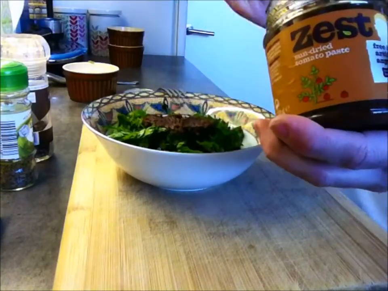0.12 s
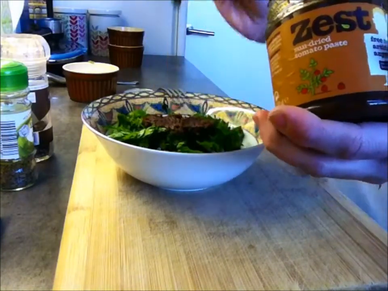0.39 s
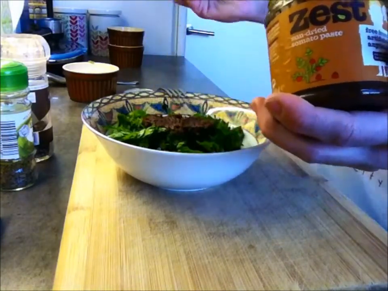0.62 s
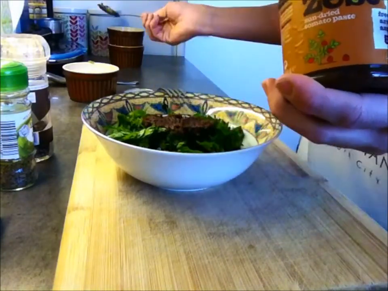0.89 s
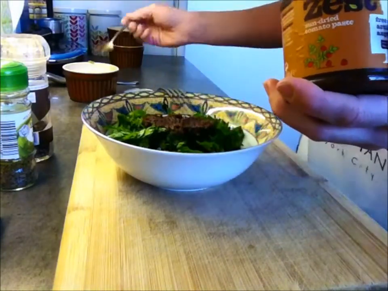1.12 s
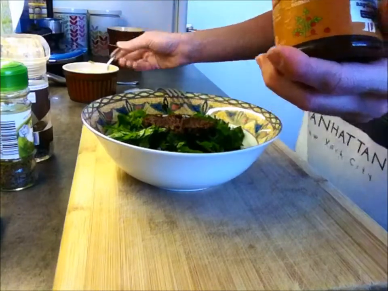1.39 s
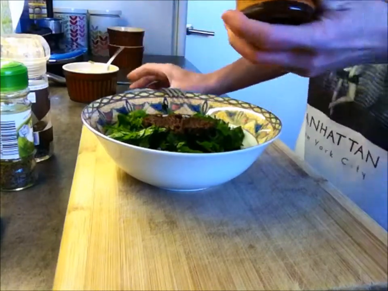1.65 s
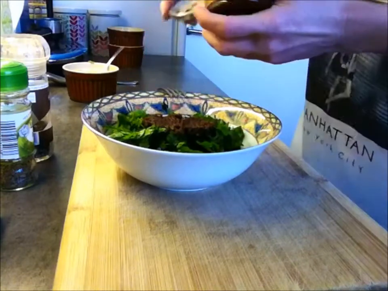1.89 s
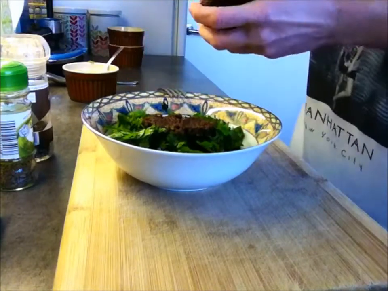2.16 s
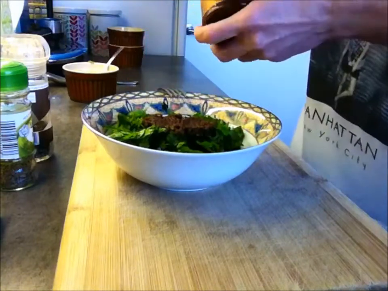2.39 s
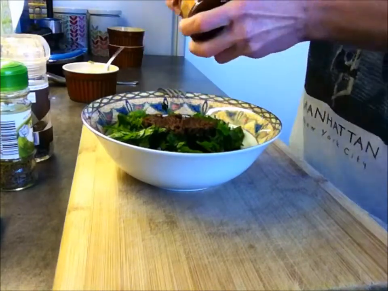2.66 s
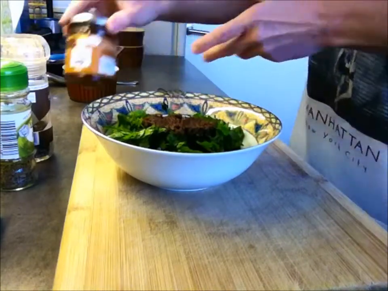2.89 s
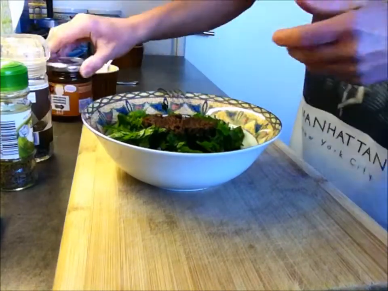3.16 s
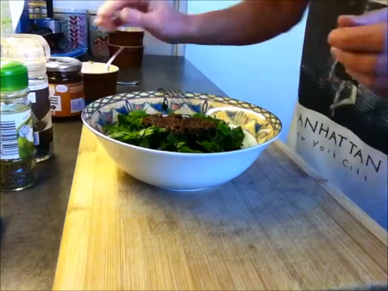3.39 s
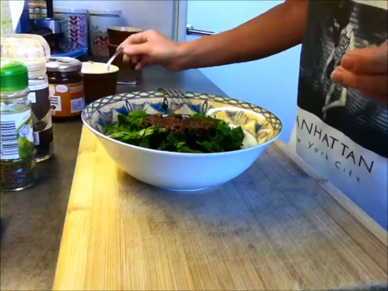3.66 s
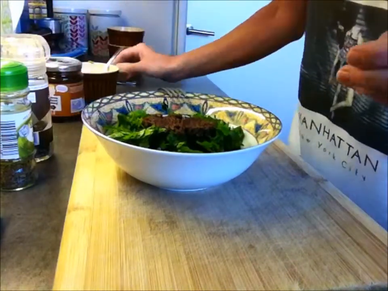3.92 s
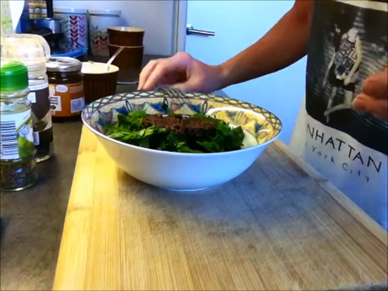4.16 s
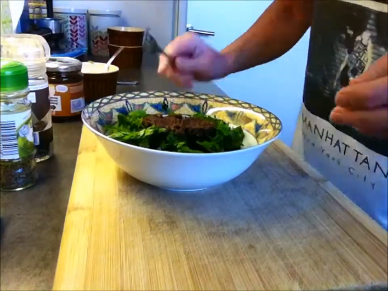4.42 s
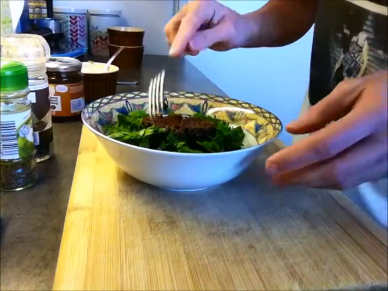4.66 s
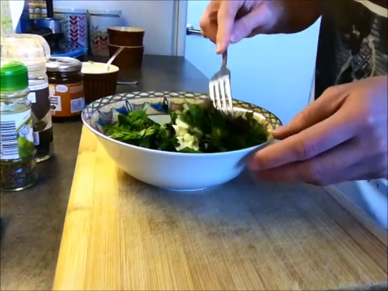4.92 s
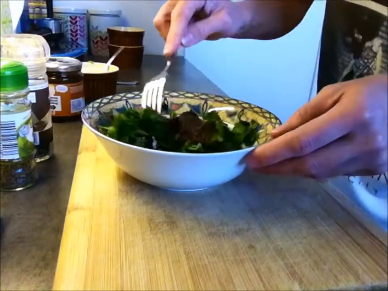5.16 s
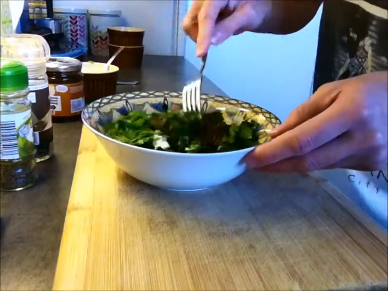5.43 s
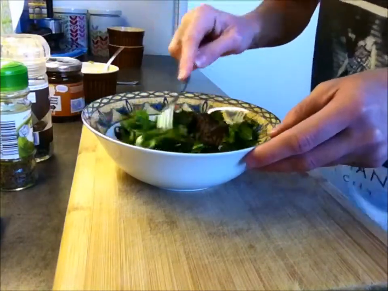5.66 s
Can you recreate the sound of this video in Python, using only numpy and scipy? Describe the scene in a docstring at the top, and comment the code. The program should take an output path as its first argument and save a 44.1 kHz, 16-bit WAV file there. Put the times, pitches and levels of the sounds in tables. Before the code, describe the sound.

Close microphone in a quiet, hard-walled kitchen with faint fridge hum. A teaspoon drops into a small ceramic dish with a bright clink and settles. A metal lid claps onto a glass jar, rattles and catches as it is tightened. The jar lands hard on the counter, by far the loudest sound, and slides briefly. After a pause a fork is picked up with a light ring, then leaves rustle very softly.

```python
"""A quiet kitchen, close microphone. A teaspoon drops into a ceramic dish, a tin lid is clapped on a glass jar
and screwed shut, the jar is set hard on the counter and slid, a fork is dragged up, then tosses leaves.
Blows are decaying modes, noise cracks and low thumps; rubs are uneven click noise through damped modes plus hiss;
leaves are shaped click noise. A fridge hums under room noise throughout; hard walls give a short bright tail."""
import sys
import numpy as np
from scipy import signal
from scipy.fft import rfft, irfft, next_fast_len
from scipy.io import wavfile
from scipy.ndimage import uniform_filter1d

SR = 44100
rng = np.random.default_rng(int(sys.argv[2]) if len(sys.argv) > 2 else 0)


def makeup_ratio(level_db):
    """Linear amplitude ratio for a level in decibels (20 dB per factor of ten)."""
    decades = np.asarray(level_db, float) / 20
    return 10 ** decades


def pcm_store(signal):
    """Save signal as 16-bit PCM."""
    levels = np.round(np.clip(np.atleast_2d(signal), -1, 1) * 32767)
    wavfile.write(sys.argv[1], SR, levels.astype(np.int16).T)


N = 255780

# Jar landing on the counter. Each row: start in seconds, ring in dB, crack in dB, favoured pitch in Hz.
JAR_LANDINGS = [(3.171, -13.5, -9.5, 800), (3.186, -23, -27.5, 800)]
# Lid striking the jar. Each row: start in seconds, ring in dB, crack in dB, favoured pitch in Hz.
LID_KNOCKS = [(2.0704, -28.5, -24.5, 4150), (2.0752, -21.5, -18, 3820), (2.0928, -24, -52, 3600),
              (2.126, -33, -38, 3700), (2.1995, -35.5, -43.5, 2650), (2.2415, -32.5, -33.5, 2140),
              (2.3105, -41, -40.5, 9200), (2.3234, -45, -52, 3870), (2.3635, -50, -44, 3900),
              (2.382, -37, -36, 2820), (2.4159, -27, -33.5, 5850), (2.43, -42, -55, 2350),
              (2.5794, -63, -65, 939)]
# Spoon bouncing. Each row: start in seconds, ring in dB, crack in dB, favoured pitch in Hz.
SPOON_DROPS = [(1.3655, -36, -35.5, 9000), (1.7205, -51.5, -49.5, 4000)]
# Dish hit or jolted. Each row: start in seconds, ring in dB, crack in dB, favoured pitch in Hz.
DISH_CLINKS = [(1.4525, -20.5, -29, 6500), (3.177, -43, -42, 9400), (3.295, -48, -60, 13000),
               (3.328, -47, -52.5, 12900)]
# Fork jolted on the counter. Each row: start in seconds, ring in dB, crack in dB, favoured pitch in Hz.
FORK_KNOCKS = [(3.174, -31, -36, 10100), (3.183, -33.5, -38, 10100), (4.41, -39, -54, 8350),
               (4.432, -42, -50, 6300)]
# Fork picked up. Each row: start in seconds, ring in dB, crack in dB, favoured pitch in Hz.
FORK_LIFT = [(4.397, -39, -44, 2200)]

# Counter modes. Each row: pitch in Hz, relative level in dB, undamped T60 in seconds.
COUNTER_MODES = [(151, -9.5, 0.39), (199.4, -15.5, 0.15), (262, 0, 0.074), (410, -5, 0.23),
                 (442, -0.5, 0.19), (524, 3.5, 0.11), (610.8, -4.5, 0.13), (780, -5, 0.11),
                 (778, -0.5, 0.11), (867, -2.5, .12), (940, -10.5, .12), (994, -1, 0.0696),
                 (1107, -5, 0.04), (1247, -8, 0.089), (1290, -6.5, 0.055), (1415, -8, 0.028),
                 (1534, -9.5, 0.021), (1810, -16, 0.088), (2200, -17.5, 0.067)]
# Tin lid modes. Each row: pitch in Hz, relative level in dB, T60 in seconds.
LID_MODES = [(800, -16.5, .1), (1078, 4, 0.12), (1187, -5, .1), (1650, -14, 0.15), (2140, -0.5, 0.048),
             (2430, -10.5, .08), (2600, -16.5, 0.14), (2910, -16.5, 0.12), (3320, -10.5, 0.16),
             (3757, -2.5, 0.033), (3870, -10.5, 0.08), (4070, 0, 0.044), (4730, -12.5, 0.084),
             (5150, 1, 0.034), (5930, -8, 0.051), (5850, -5, 0.03), (7180, -14.5, 0.094),
             (8100, -14, 0.098), (8600, -17.5, 0.058), (10180, -24, .08), (11000, -9.5, 0.056)]
# Jar thread modes. Each row: pitch in Hz, relative level in dB, undamped T60 in seconds.
THREAD_MODES = [(260, -24, 0.017), (516, 3, 0.062), (800, -1.5, 0.15), (940, 1.5, 0.082), (1080, -3.5, 0.1),
                (1660, 13, 0.011), (2350, -9, 0.055), (3740, -15, 0.024), (4030, 3, 0.042),
                (4700, 0, 0.042)]
# Teaspoon modes. Each row: pitch in Hz, relative level in dB, undamped T60 in seconds.
SPOON_MODES = [(2270, -9, .1), (3165, 6, 0.079), (3900, -10, .06), (4750, 11.5, 0.038), (5100, -13, .05),
               (5530, -14, 0.116), (6385, 0, 0.11), (7400, -16, .1), (8600, -6, 0.11), (11020, 4, 0.056),
               (12200, 4, .1), (13000, 0, .08), (13600, -12, .1), (14160, 0, .1), (16000, -17, 0.13)]
# Ceramic dish modes. Each row: pitch in Hz, relative level in dB, T60 in seconds.
DISH_MODES = [(2330, -7, .27), (4500, -26.5, .08), (4850, -17.5, .1), (5454, -8.5, 0.34), (5974, -13.5, .1),
              (6300, -8, 0.057), (6420, -5, 0.061), (6500, -27, .15), (7542, -19.5, 0.1), (8057, -21, 0.27),
              (8720, -20.5, .2), (8713, -20.5, .2), (9340, -9.5, .14), (9400, 5.5, 0.11), (10050, -16, .14),
              (11400, -20, .16), (12200, -19, .14), (12380, -15, .12), (12900, -4, 0.073),
              (13060, -12.5, .14), (14050, -14.5, .3), (14590, 0.5, .16), (14970, -14.5, .12),
              (15600, -16, .1)]
# Fork modes. Each row: pitch in Hz, relative level in dB, undamped T60 in seconds.
FORK_MODES = [(1264, -16, 0.25), (1707, -5.5, 0.6), (2200, -16, .1), (2713, -9.5, 0.76), (3937, -7.5, 0.27),
              (4560, -18.5, 0.12), (5340, -5, 0.21), (5706, -11, 0.09), (6891, -2.5, 0.26),
              (8590, -1.5, 0.11), (9390, -8, 0.15), (9685, -23, .14), (10350, -10.5, 0.083),
              (10760, -6.5, 0.077), (11330, -13.5, .1), (12190, -18, .15), (12440, -16, .14),
              (13080, -12, .14), (14300, -13.5, .12), (14720, -10, .06)]

# Crack spectrum of the counter. Each row: frequency in Hz, relative density in dB per Hz.
COUNTER_CRACK = [(35, -43), (110, -28), (400, -15), (550, 0), (900, -10.5), (1530, -7), (2000, -22),
                 (3000, -30.5), (6800, -41.5), (15800, -45)]
# Crack and rub spectrum of the lid. Each row: frequency in Hz, relative density in dB per Hz.
LID_CRACK = [(290, -56.5), (500, -22), (1080, -10.5), (1420, -21), (2750, -8), (3130, -13), (3520, 3.5),
             (4300, -5.5), (5420, -8), (15800, -19.5)]
# Crack spectrum of the spoon. Each row: frequency in Hz, relative density in dB per Hz.
SPOON_CRACK = [(120, -48), (200, -1), (732, -2), (1140, -9.5), (3160, -18.5), (3660, -24.5), (4640, -15),
               (7070, -15.5), (15800, -15.5)]
# Crack spectrum of the dish and the lying fork. Each row: frequency in Hz, relative density in dB per Hz.
DISH_CRACK = [(88, -42.5), (150, -7.5), (1070, -14.5), (2300, -15), (3660, -26), (5310, -16.5),
              (7110, -22.5), (9160, -14.5), (10700, -26), (14600, -11), (15800, -25)]
# Crack and scrape spectrum of the fork. Each row: frequency in Hz, relative density in dB per Hz.
FORK_CRACK = [(290, -49), (500, -1.5), (1500, -4.5), (1730, 0), (4970, -17), (8740, -9.5), (14700, -29),
              (15300, -39.5), (16000, -56)]

# Jar sliding. Each row: full pressure at seconds, held seconds, ring in dB, hiss in dB.
JAR_SLIDE = [(3.205, 0.087, -45.5, -39), (3.31, 0.027, -40, -38.5), (3.36, 0.0084, -53, -46.5)]
# Lid turning on the thread. Each row: full pressure at seconds, held seconds, ring in dB, hiss in dB.
LID_TURN = [(2.385, 0.011, -47.5, -66), (2.418, 0.0055, -42, -54.5), (2.5, 0.032, -55.5, -68),
            (2.575, 0.0063, -50.5, -52.5)]
# Spoon settling. Each row: full pressure at seconds, held seconds, ring in dB, hiss in dB.
SPOON_SETTLE = [(1.6, 0.012, -68.5, -63.5), (1.69, .015, -78, -66.5), (1.735, .02, -66, -62)]
# Fork dragged. Each row: full pressure at seconds, held seconds, ring in dB, hiss in dB.
FORK_DRAG = [(4.397, 0.013, -48.5, -48.5)]
# Forkfuls of leaves turned over. Each row: fullest at seconds, held seconds, rustle in dB.
TOSS = [(4.84, 0.011, -70.5), (5.036, 0.0084, -68.5), (5.116, .006, -62.5), (5.17, 0.011, -69.5),
        (5.392, .005, -68.5), (5.476, .005, -71), (5.67, 0.046, -69.5), (5.76, 0.037, -68)]
# Wet leaf ticks. Each row: start in seconds, level in dB, centre in Hz.
TICKS = [(4.8448, -66, 7110), (5.0315, -62, 9270), (5.0482, -62, 9610), (5.0933, -60, 12900),
         (5.1154, -60, 6370), (5.189, -62, 13760), (5.2478, -68.5, 7820), (5.3863, -57.5, 9530),
         (5.4804, -71, 4120), (5.689, -66, 5460), (5.7494, -61.5, 8990)]

# Spectrum of the jar's slide hiss. Each row: frequency in Hz, relative density in dB per Hz.
SLIDE_HISS = [(76, -48), (130, -20.5), (198, -7.5), (377, -8.5), (520, -0.5), (648, -3), (1180, -12),
              (3040, -32.5), (7820, -38.5), (9560, -43), (14600, -43), (15800, -52)]
# Spectrum of the spoon's settling hiss. Each row: frequency in Hz, relative density in dB per Hz.
SETTLE_HISS = [(470, -27.5), (800, -8), (1670, 2.5), (2660, -6), (3950, -1.5), (4330, -14), (4850, 1),
               (12000, -35), (15600, -57), (22000, -120)]
# Spectrum of leaf rustle. Each row: frequency in Hz, relative density in dB per Hz.
LEAF_RUSTLE = [(2500, -8), (5000, -3.5), (9000, -4), (14000, -4), (16000, -8.5)]

# Low hollow thumps that go with blows of the spoon, dish, jar and fork. Each row: start in seconds, level in
# dB, pitch in Hz, T60 in seconds.
HOLLOW_THUMPS = [(1.3655, -39, 698, .045), (1.4525, -36.5, 505, 0.072), (1.721, -54, 306, 0.039),
                 (3.171, -11.5, 524, 0.11), (3.172, -36, 55, 0.076), (3.186, -24.5, 262, 0.067),
                 (3.295, -33.5, 227, 0.085), (3.328, -39, 512, 0.059), (4.397, -38, 815, 0.052),
                 (4.41, -48.5, 557, 0.088)]
# Hollow thumps of the jar as the lid seats. Each row: start in seconds, level in dB, pitch in Hz.
JAR_THUMPS = [(2.1995, -48, 1020), (2.2413, -39.5, 995), (2.3097, -43, 1170), (2.3234, -37, 742),
              (2.3635, -35.5, 726), (2.382, -30, 690), (2.4156, -27.5, 530), (2.43, -34, 1080),
              (2.457, -49, 525), (2.5154, -38.5, 537), (2.55, -40.5, 940), (2.5788, -42.5, 258)]

# Decay of the kitchen. Each row: frequency in Hz, T60 in seconds.
TAIL_T60 = [(200, 0.24), (1000, 0.41), (4000, 0.37), (12000, 0.26)]
# Spectrum of room and microphone noise. Each row: frequency in Hz, relative density in dB per Hz.
ROOM_NOISE = [(20, -22.5), (70, -20), (130, -2.5), (165, -1.5), (250, -6.5), (320, 2.5), (420, -2.5),
              (540, -9), (630, -8.5), (920, -7.5), (1450, -16.5), (1850, -15), (2700, -20.5),
              (14500, -28.5), (16000, -28)]
# Fridge hum. Each row: pitch in Hz, mean level in dB rms.
FRIDGE = [(100, -72.5), (200, -77), (1850, -86)]

# Stroke pressure: (rise dB per s, fall dB per s)
JAR_PACE, LID_PACE, SPOON_PACE = (630, 280), (440, 336), (900, 270)
FORK_PACE, TOSS_PACE = (590, 440), (280, 130)
PUSH_S = 0.0013  # build-up of a blow
JAR_THUMP_T60_S = 0.04
SPOON_LOW_MODES = 6  # a slow rub stirs only the lowest modes
TAIL_DB, ROOM_DB = -6, -64.5
BASS_HZ, TOP_HZ = 25, 16300


def span(seconds):
    """Sample times from zero."""
    return np.arange(int(seconds * SR)) / SR


def fade(t, t60_s):
    """Exponential decay, 60 dB in t60_s (2 ms at least)."""
    return np.exp(-np.log(1000) * t / np.maximum(t60_s, .002))


def push(t):
    """Smooth build-up of a blow's force."""
    return 1 - np.exp(-(t / PUSH_S) ** 2)


def across(table, hz):
    """A (Hz, value) table read on a log-frequency axis."""
    f, v = np.transpose(table)
    return np.interp(np.log(np.maximum(hz, 1)), np.log(f), v)


def coloured(x, colour):
    """Shapes x by a spectrum, to rms 1 for white input of rms 1."""
    hz = np.arange(len(x) // 2 + 1) * SR / len(x)
    gain = makeup_ratio(across(colour, hz))
    return irfft(rfft(x) * gain / np.sqrt(np.mean(gain ** 2)), len(x))


def convolve(x, response):
    """x played through an impulse response."""
    size = next_fast_len(len(x) + len(response))
    return irfft(rfft(x, size) * rfft(response, size), size)[:len(x)]


def add_at(out, s, sound):
    """Adds sound to out from s seconds."""
    start = int(s * SR)
    out[start:start + len(sound)] += sound


def walk(rate_hz):
    """Random levels held 1 / rate_hz s and slewed twice; spread near 1."""
    k = int(SR / rate_hz)
    steps = np.repeat(rng.standard_normal(N // k + 1), k)
    return 1.3 * uniform_filter1d(uniform_filter1d(steps, k), k)[:N]


def curve(rows, pace):
    """Gain over time of each dB column: every stroke rises, holds and falls at the hand's pace."""
    s, held_s, *columns = np.transpose(rows)[:, :, None]
    t = np.arange(N) / SR
    rise_db_per_s, fall_db_per_s = pace
    under_db = rise_db_per_s * np.maximum(s - t, 0) + fall_db_per_s * np.maximum(t - s - held_s, 0)
    return [makeup_ratio(db - under_db).max(axis=0) for db in columns]


def grit(spread_db):
    """Dense contact clicks of very uneven size, rms 1."""
    x = rng.standard_normal(N) * makeup_ratio(spread_db * rng.exponential(size=N))
    return x / np.std(x)


def ring(modes, favoured_hz, fall_db_per_oct, rise_s, split, twin_db):
    """Free decay of modes, strongest near the contact point's pitch; two close twins beat with each."""
    t = span(.6)
    hz, db, t60_s = np.transpose(modes)[:, :, None]
    db = db - np.minimum(fall_db_per_oct * np.abs(np.log2(hz / favoured_hz)), 13)
    turn, offset = rng.random((2, 3, len(modes), 1))
    # main line starts at zero, pushed one way or the other
    lines = np.sin(2 * np.pi * (hz * t + np.round(turn[0]) / 2))
    for side in (1, 2):
        twin_hz = hz * (1 + (-1) ** side * split * (.5 + offset[side]))
        lines = lines + makeup_ratio(twin_db) * np.sin(2 * np.pi * (twin_hz * t + turn[side]))
    mixed = (makeup_ratio(db) * fade(t, t60_s) * lines).sum(axis=0)
    mixed = mixed / np.sqrt(np.sum(makeup_ratio(2 * db)))
    return mixed * (1 - np.exp(-t / max(rise_s, 1e-4)))


def blows(rows, modes, crack, fall_db_per_oct, rise_s, split, twin_db, crack_t60_s):
    """Each blow: the modes ring and the contact cracks."""
    out, t = np.zeros(N + SR), span(.6)
    for s, ring_db, crack_db, favoured_hz in rows:
        # a soft, low contact has a duller crack
        colour = [(hz, db - 0.21 * fall_db_per_oct * max(np.log2(hz / favoured_hz), 0)) for hz, db in crack]
        burst = coloured(rng.standard_normal(len(t)), colour) * fade(t, crack_t60_s) * push(t)
        rung = ring(modes, favoured_hz, fall_db_per_oct, rise_s, split, twin_db)
        add_at(out, s, makeup_ratio(ring_db) * rung + makeup_ratio(crack_db) * burst)
    return out[:N]


def thumps(rows):
    """Short low tones of a hollow body."""
    out, t = np.zeros(N + SR), span(.6)
    for s, db, hz, t60_s in rows:
        tone = np.sin(2 * np.pi * hz * t) * fade(t, t60_s) * push(t)
        add_at(out, s, makeup_ratio(db) * tone)
    return out[:N]


def rubbing(rows, pace, modes, colour, t60_factor, spread_db):
    """Contact grit drives the hand-damped modes and is also heard as hiss."""
    ring_gain, hiss_gain = curve(rows, pace)
    damped = [(hz, db, t60_s * t60_factor) for hz, db, t60_s in modes]
    # no pitch favoured, twins inaudible
    body = ring(damped, 1000, 0, rise_s=.001, split=0, twin_db=-99)
    rung = convolve(grit(spread_db) * ring_gain, body / np.linalg.norm(body))
    return rung + coloured(grit(spread_db) * hiss_gain, colour)


def jar():
    """Heavy jar set down, exciting counter modes, then pushed along with a rough rumble."""
    thud = blows(JAR_LANDINGS, COUNTER_MODES, COUNTER_CRACK, fall_db_per_oct=0.83, rise_s=.002,
                 split=0.045, twin_db=-12.5, crack_t60_s=0.079)
    slide = rubbing(JAR_SLIDE, JAR_PACE, COUNTER_MODES, SLIDE_HISS, t60_factor=0.76, spread_db=2.4)
    return thud + slide


def lid():
    """Tin lid clapped on, catching on the thread, then turned tight over the hollow jar."""
    knocks = blows(LID_KNOCKS, LID_MODES, LID_CRACK, fall_db_per_oct=20.0, rise_s=0.0022,
                   split=0.026, twin_db=-6, crack_t60_s=0.044)
    hollow = thumps((*row, JAR_THUMP_T60_S) for row in JAR_THUMPS)
    turning = rubbing(LID_TURN, LID_PACE, THREAD_MODES, LID_CRACK, t60_factor=0.42, spread_db=1.2)
    return knocks + hollow + turning


def spoon():
    """Teaspoon bouncing, then settling; the dish clinks when hit or jolted."""
    bounces = blows(SPOON_DROPS, SPOON_MODES, SPOON_CRACK, fall_db_per_oct=3.4, rise_s=0.0012,
                    split=0.0222, twin_db=-5.0, crack_t60_s=0.088)
    clinks = blows(DISH_CLINKS, DISH_MODES, DISH_CRACK, fall_db_per_oct=6.1, rise_s=0.0052,
                   split=0.0055, twin_db=-6, crack_t60_s=.08)
    settling = rubbing(SPOON_SETTLE, SPOON_PACE, SPOON_MODES[:SPOON_LOW_MODES], SETTLE_HISS,
                       t60_factor=0.21, spread_db=2.4)
    return bounces + clinks + settling


def fork():
    """Fork jolted where it lies, later scraped along and lifted with its tines left ringing."""
    # the counter damps the long rings
    lying = [(hz, db, min(t60_s, .1)) for hz, db, t60_s in FORK_MODES]
    knocks = blows(FORK_KNOCKS, lying, DISH_CRACK, fall_db_per_oct=3.0, rise_s=0.0013,
                   split=0.00616, twin_db=-4.0, crack_t60_s=0.14)
    lift = blows(FORK_LIFT, FORK_MODES, FORK_CRACK, fall_db_per_oct=1.4, rise_s=0.0044,
                 split=0.0025, twin_db=-25, crack_t60_s=0.078)
    drag = rubbing(FORK_DRAG, FORK_PACE, lying, FORK_CRACK, t60_factor=0.32, spread_db=2.8)
    return knocks + lift + drag


def leaves():
    """Soft crackle of turned leaves as shaped grit, with a few lone noise ticks."""
    out = coloured(grit(2.8) * curve(TOSS, TOSS_PACE)[0], LEAF_RUSTLE)
    t = span(.03)
    for s, db, hz in TICKS:
        band = [(hz / 5.6, -20), (hz, 0), (hz * 1.6, -12)]
        tick = coloured(rng.standard_normal(len(t)), band) * fade(t, 0.027)
        add_at(out, s, makeup_ratio(db) * tick)
    return out


def tail():
    """Response of the kitchen: octaves of noise, dying faster in the high treble, energy 1."""
    t, out = span(0.54), 0
    for hz in 125 * 2. ** np.arange(8):
        band = [(hz / 2, -30), (hz / 1.1, 0), (hz * 1.5, 0), (hz * 2, -30)]
        octave = coloured(rng.standard_normal(len(t)), band) * fade(t, across(TAIL_T60, hz))
        out = out + octave * np.sqrt(hz) / np.linalg.norm(octave)
    out = out * (1 - np.exp(-t / 0.0064))
    return out / np.linalg.norm(out)


def fridge():
    """Steady sines, each wavering slightly in level."""
    t, out = np.arange(N) / SR, 0
    for hz, db in FRIDGE:
        out = out + makeup_ratio(db + .6 * walk(6)) * np.sqrt(2) * np.sin(2 * np.pi * hz * t)
    return out


def background():
    """Shaped room and microphone noise, a wavering low rumble and the fridge."""
    noise = coloured(rng.standard_normal(N), ROOM_NOISE) * makeup_ratio(ROOM_DB)
    band = [(120, -22.0), (200, -11), (330, 7), (450, 0.5), (900, -18)]
    rumble = coloured(rng.standard_normal(N), band) * makeup_ratio(-75.0 + 2.5 * walk(4.8))
    return noise + rumble + fridge()


def scene():
    """Everything near, through the room, over the background."""
    near = jar() + lid() + spoon() + fork() + leaves() + thumps(HOLLOW_THUMPS)
    reverb = makeup_ratio(TAIL_DB) * convolve(near, tail())
    return (near + reverb + background())[None]


def band_limit(x):
    """A steep low-pass at the top of the band."""
    return signal.sosfilt(signal.butter(12, 16850, fs=SR, output="sos"), x)


def record(dry):
    """The microphone thins the deep bass, sits slightly off zero and cuts the top."""
    bass_cut = signal.butter(2, BASS_HZ, "high", fs=SR, output="sos")
    top_cut = signal.ellip(8, .2, 70, TOP_HZ, fs=SR, output="sos")
    offset = signal.sosfilt(bass_cut, dry) - makeup_ratio(-81.5)
    mix = signal.sosfilt(top_cut, offset)
    return band_limit(mix)


dry = scene()
out = record(dry)
pcm_store(out)
```